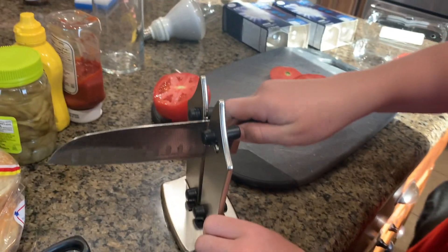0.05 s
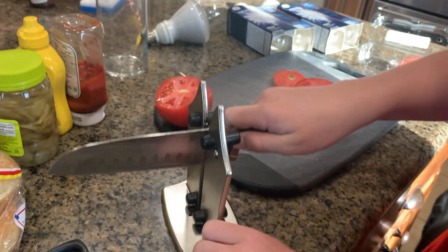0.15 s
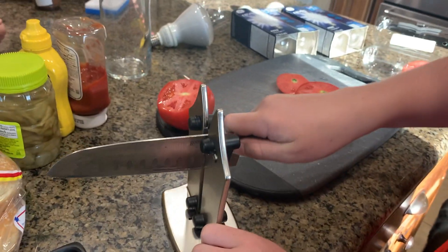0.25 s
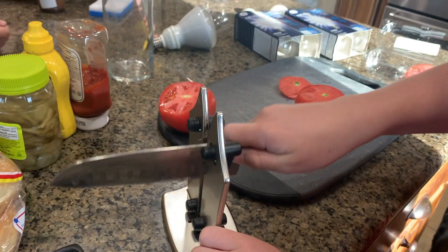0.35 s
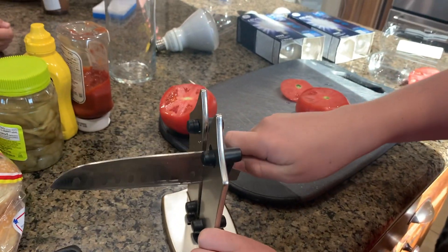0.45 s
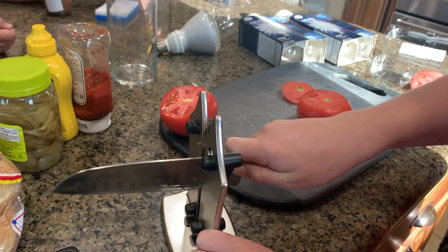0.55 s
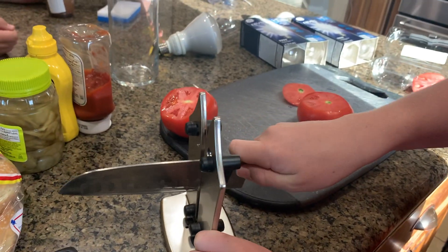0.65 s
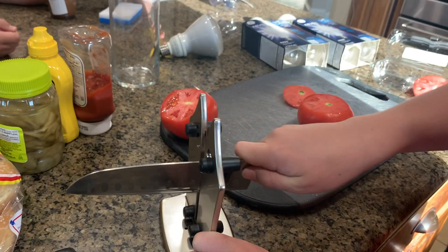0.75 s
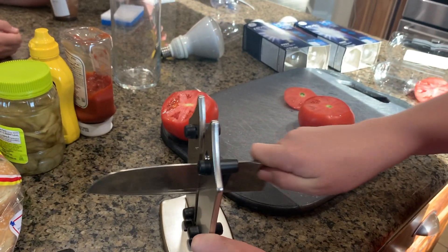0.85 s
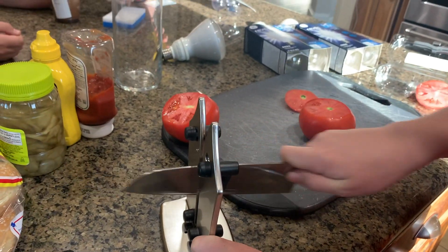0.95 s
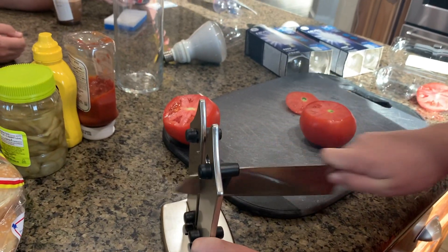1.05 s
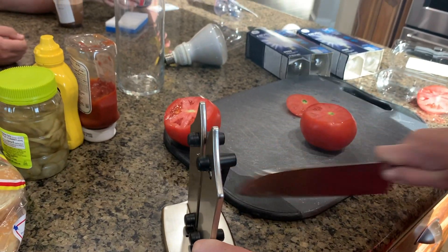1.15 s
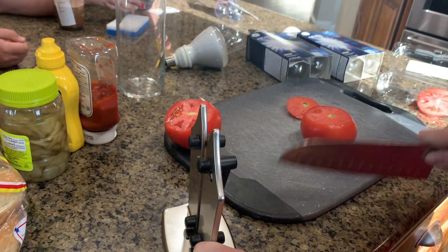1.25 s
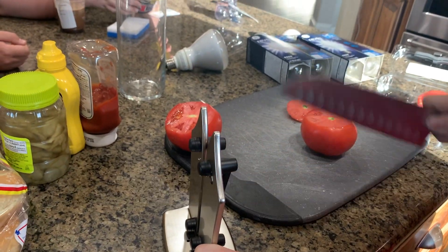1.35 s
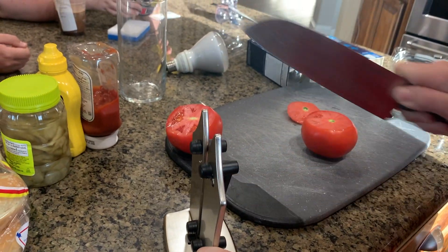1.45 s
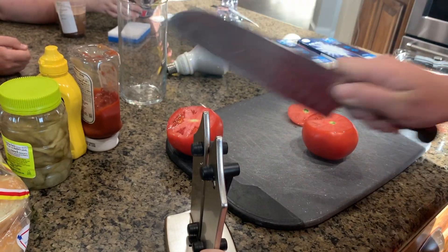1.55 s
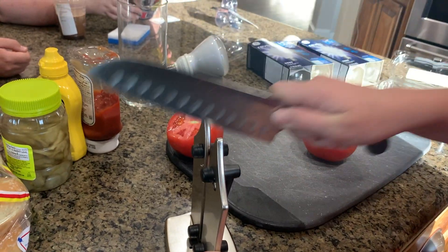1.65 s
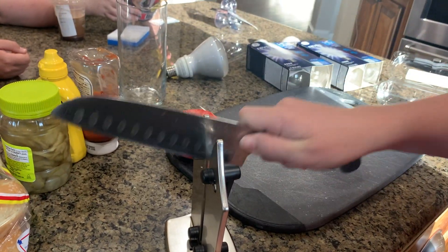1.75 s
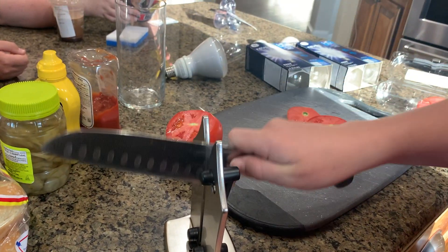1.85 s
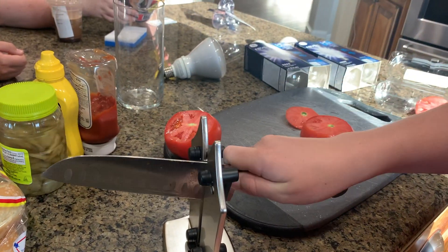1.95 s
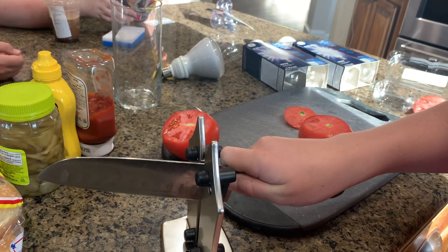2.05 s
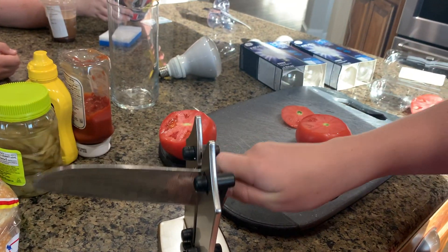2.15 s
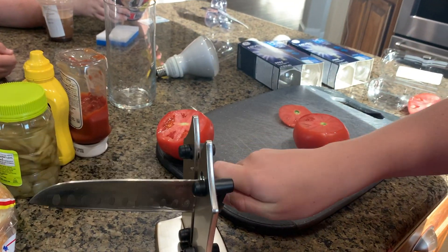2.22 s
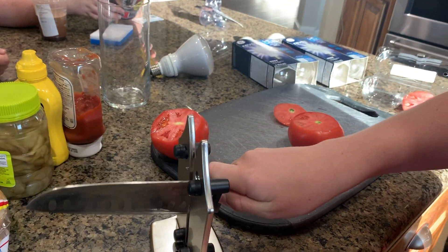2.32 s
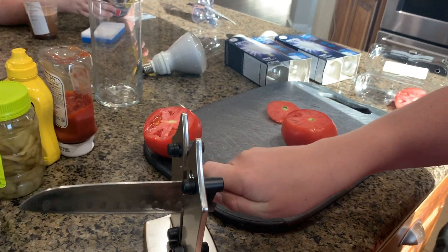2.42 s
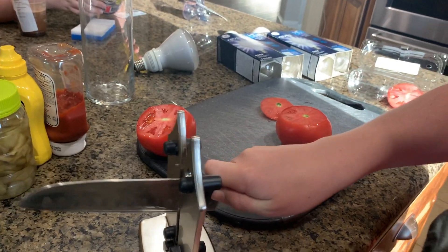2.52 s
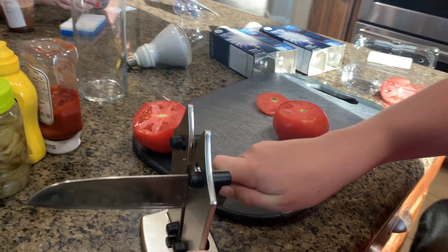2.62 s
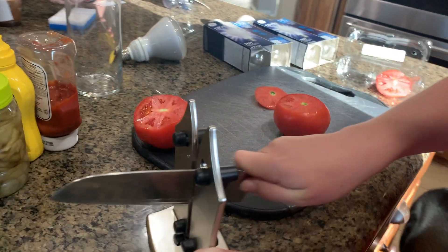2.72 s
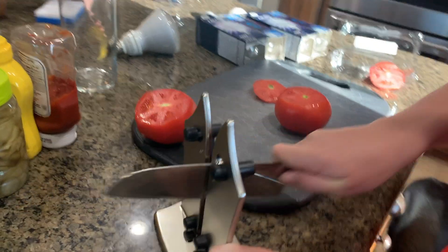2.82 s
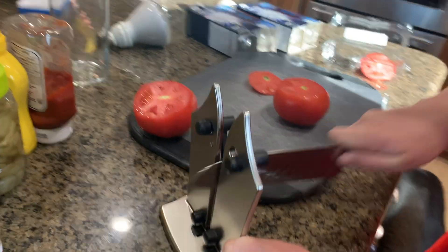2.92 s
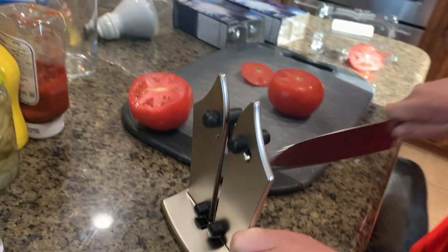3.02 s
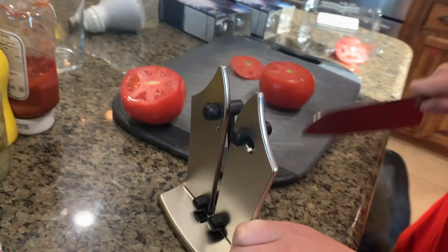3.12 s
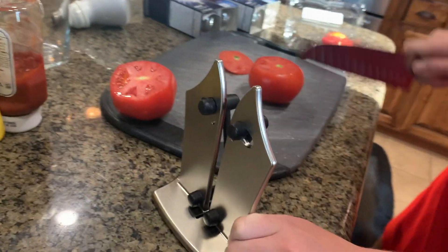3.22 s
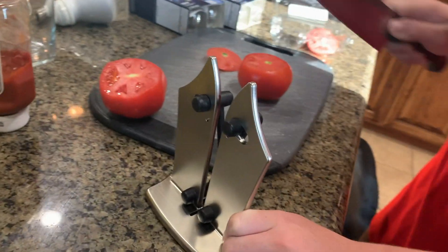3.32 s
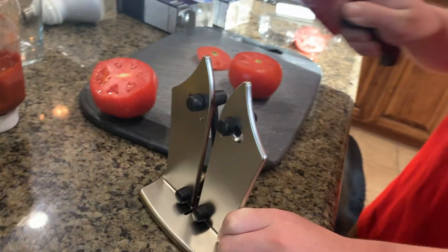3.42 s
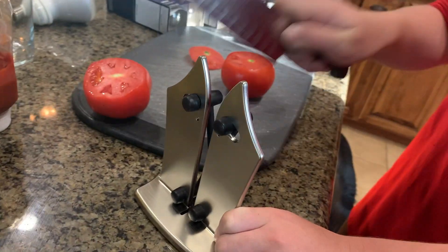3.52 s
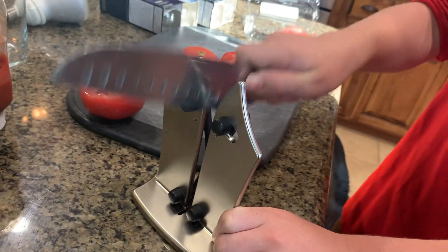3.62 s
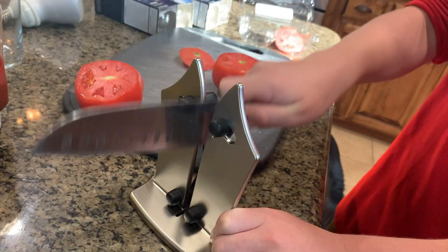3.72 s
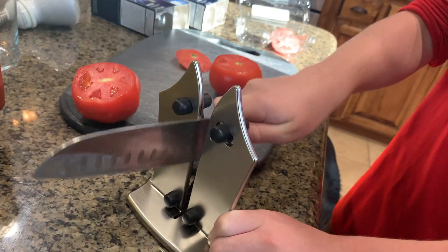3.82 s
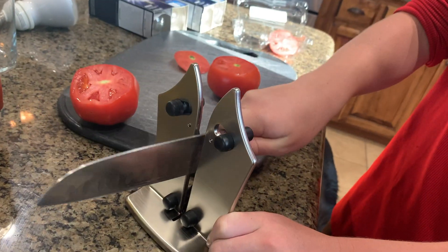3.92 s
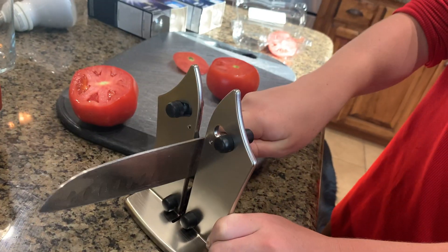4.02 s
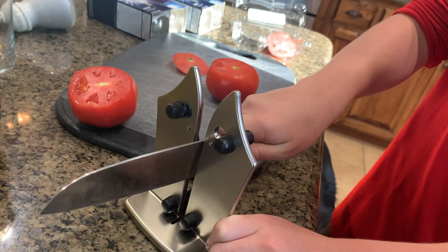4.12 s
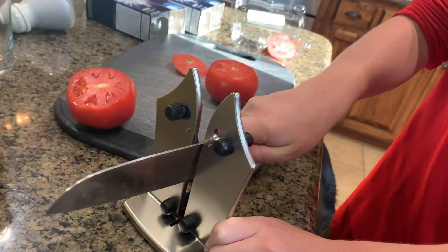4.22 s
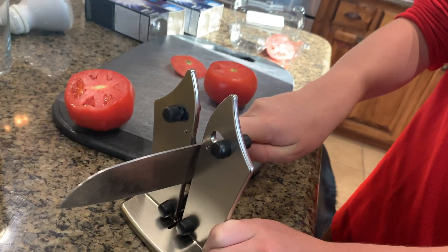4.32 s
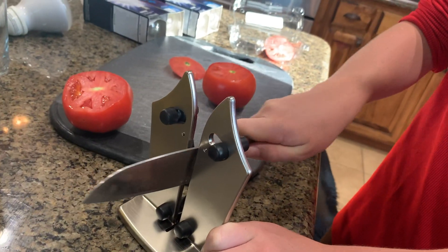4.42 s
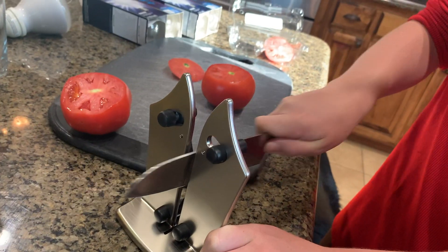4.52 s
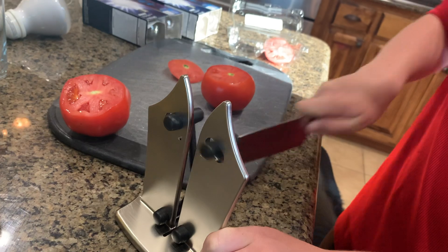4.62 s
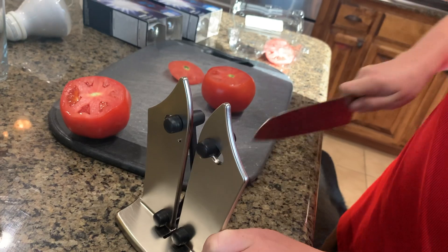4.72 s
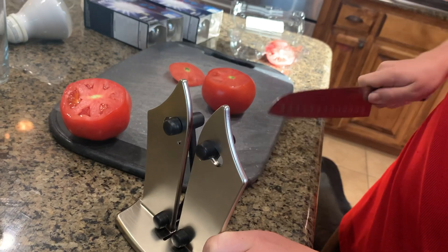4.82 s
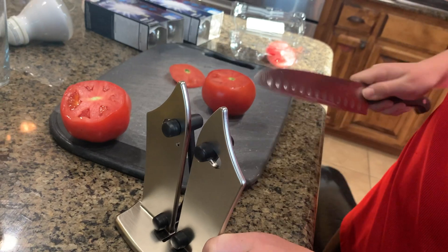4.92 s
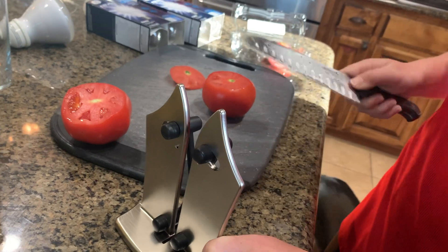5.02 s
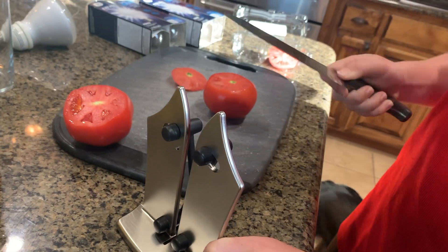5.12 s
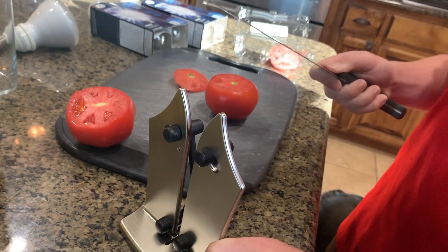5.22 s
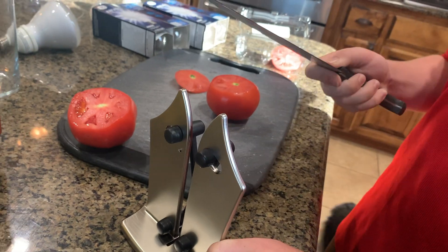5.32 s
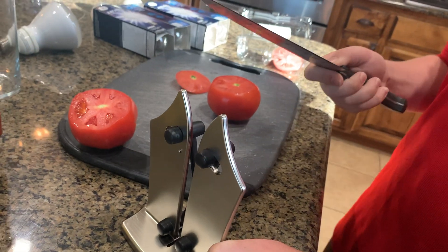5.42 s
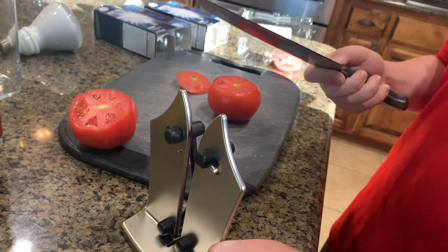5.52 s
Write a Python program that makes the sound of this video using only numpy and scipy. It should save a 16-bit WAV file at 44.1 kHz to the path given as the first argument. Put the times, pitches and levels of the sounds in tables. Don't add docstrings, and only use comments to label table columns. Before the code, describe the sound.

In a reflective kitchen, a steady low motor hum runs throughout. Near a hand-held stereo microphone, a steel blade rasps through a sharpener three times, roughly two seconds apart, with light clinks as it is reseated and a hard springy clack closing each pull. Low bumps shake the microphone mid-clip. After the last snap only hum, hiss and faint ticks remain.

```python
import sys
import numpy as np
from scipy import signal
from scipy.fft import rfft, irfft
from scipy.io import wavfile
from scipy.ndimage import uniform_filter1d

SR = 44100
rng = np.random.default_rng(int(sys.argv[2]) if len(sys.argv) > 2 else 0)


def pcm_store(signal):
    levels = np.round(np.clip(np.atleast_2d(signal), -1, 1) * 32767)
    wavfile.write(sys.argv[1], SR, levels.astype(np.int16).T)


def rack_gain(trim_db):
    fader = np.asarray(trim_db, float)
    return 10 ** (fader / 20)


N = 245548


def evened(x):
    return x / np.sqrt(np.mean(x ** 2) + 1e-20)


def over_hz(table, size, col=1):
    rows = np.transpose(table)
    bins_hz = np.fft.rfftfreq(size, 1 / SR)
    return np.interp(np.log(bins_hz + 1), np.log(rows[0] + 1), rows[col])


def over_time(rows):
    s, *cols = np.transpose(rows)
    return [np.interp(np.arange(N) / SR, s, c) for c in cols]


def shaped(x, gain):
    return irfft(rfft(x) * gain, N)


def band(x, lo_hz, hi_hz):
    sos = signal.butter(2, [lo_hz, min(hi_hz, SR * .49)], "band", fs=SR, output="sos")
    return signal.sosfilt(sos, x)


def wander(rate_hz):
    smooth = np.exp(-(np.fft.rfftfreq(N, 1 / SR) / rate_hz) ** 2)
    return evened(shaped(rng.standard_normal(N), smooth))


def hump(s, length):
    phase = (np.arange(N) / SR - s) / max(length, .01)
    return np.cos(np.pi * np.clip(phase, -.5, .5)) ** 2


def pair(a, b, col):
    # f/Hz, of the far hum/1, of the near knife/1, of the room tail/1
    likeness = [(50, .99, .99, .99), (300, .98, .95, .98), (500, .85, .8, .85), (800, .3, .6, .3),
                (1300, .2, .92, .3), (2600, .2, .7, .2), (3500, .5, .7, .5), (4300, .55, 1.0, .98),
                (5200, .72, 1.0, .99), (6500, 1.0, 1.0, 1.0)]
    same = np.clip(over_hz(likeness, N, col), 0, 1)
    right = irfft(same * rfft(a) + np.sqrt(1 - same ** 2) * rfft(b), N)
    return np.array([a, right])


def appliance():
    # f/Hz, density/dB per Hz
    rumble_curve = [(15, -73), (25, -44), (48, -29), (75, -31), (97, -12.5), (130, -14.5), (181, -9),
                    (220, 2), (264, -8), (279, -12.5), (299, -4.5), (316, -4.5), (344, -10.5), (412, -20.5),
                    (700, -42), (910, -73), (1540, -120)]
    # f/Hz, density/dB per Hz
    hiss_curve = [(290, -22.5), (500, -7.5), (651, -8), (859, -4), (980, -8.5), (1070, -5), (1430, -13),
                  (1840, -16), (3400, -30), (11000, -44), (16500, -43.5)]
    # t/s, level/dB
    whine_curve = [(0, -43.5), (.6, -41.5), (1.2, -45.5), (1.8, -41), (2.3, -41.5), (2.9, -37), (3.6, -36),
                   (4.5, -33.5), (4.8, -33.5), (5.2, -34.5), (5.57, -32)]
    # middle t/s, length/s, hiss level/dB
    drags = [
        (0.84, 0.24, -54.5),
        (2.69, 0.39, -45),
        (4.357, 0.47, -46.5),
    ]
    noise = rng.standard_normal((2, 2, N))
    rumble = rack_gain(-32) * evened(shaped(noise[0], rack_gain(over_hz(rumble_curve, N))))
    hiss_level = rack_gain(-55.5) + sum(rack_gain(db + 0.5) * hump(s, length) for s, length, db in drags)
    hiss = hiss_level * evened(shaped(noise[1], rack_gain(over_hz(hiss_curve, N))))

    whine_db = over_time(whine_curve)[0] + 1.9 * wander(0.74) + 5.0
    whine_hz = 292.7 + 0.32 * wander(3.0)
    turn = 2 * np.pi * np.cumsum(whine_hz) / SR
    ports = np.array([np.sin(turn), rack_gain(1.0) * np.sin(turn + 0.19)])
    return pair(*(rumble + hiss), 1) + np.sqrt(2) * rack_gain(whine_db) * ports


def shake():
    # middle t/s, length/s, level/dB
    jolts = [(0.001, 0.066, -55.5), (0.82, .35, -49), (1.182, .08, -41.5), (2.38, 0.34, -50),
             (2.563, .12, -33.5), (2.676, 0.13, -36.5), (2.781, 0.23, -43), (3.047, .12, -55.5),
             (3.419, 0.45, -61), (3.808, 0.13, -50.5), (3.97, 0.38, -53.5), (4.249, 0.14, -46),
             (4.399, 0.15, -48), (4.598, 0.35, -54)]
    steady_hand_db = -61.5
    thuds = band(band(rng.standard_normal(N), 45, 85), 45, 85)
    level = rack_gain(steady_hand_db) + sum(rack_gain(db) * hump(s, length) for s, length, db in jolts)
    return level * evened(thuds)


def kitchen(x):
    # f/Hz, t60/s
    decay = [(500, .65), (1500, 1), (2500, 0.74), (4000, 0.77), (6000, 0.52), (9000, 0.43), (12000, 0.22),
             (16000, 0.38)]
    taps = np.zeros((2, SR))
    at = np.arange(300, SR - 20, 20) + rng.integers(0, 20, (2, (SR - 301) // 20))
    np.put_along_axis(taps, at, rng.choice([-1., 1.], at.shape), 1)
    hz, t, z = signal.stft(taps, SR, nperseg=256)
    fade = rack_gain(-60 * t / over_hz(decay, size=256)[:, None])
    tail = signal.istft(z * fade, SR, nperseg=256)[1]
    return signal.fftconvolve(x[None], tail / np.linalg.norm(tail[0]), axes=1)[:, :N]


def resonate(x, hz, width):
    turn = np.exp(2j * np.pi * np.cumsum(hz) / SR)
    r = np.exp(-np.pi * width / SR)
    return 2 * (turn * signal.lfilter([1 - r], [1, -r], x / turn)).real


def ring(x, modes):
    out = np.zeros(N)
    for hz, width, db in modes:
        swell = rack_gain(db - 1.5 + 2.8 * wander(14))
        out += swell * resonate(x, hz * (1 + .02 * wander(3)), width)
    return out


def crackle(drives, low_hz):
    edges = [(low_hz, 4400), (4400, 9300), (9300, 17000)]
    regions = sum((-1) ** k * band(d, *e) for k, (d, e) in enumerate(zip(drives, edges)))
    return band(regions, .8 * low_hz, 20000)


def blade(x, t60):
    t = np.arange(4000) / SR
    answers = rng.standard_normal((3, 4000)) * rack_gain(-60 * t / t60)
    turn = wander(4.7)
    rung = np.zeros(N)
    for k, answer in enumerate(answers):
        heard = x * np.cos(turn + k * np.pi / 3)
        rung += signal.oaconvolve(heard, answer / np.linalg.norm(answer))[:N]
    return rack_gain(-8.5) * x + rack_gain(-0.5) * rung


def rings():
    # t/s, f/Hz, level/dB, t60/s
    modes = [(1.932, 8150, -48, .11), (1.932, 1280, -44, .04), (1.936, 6200, -50, .06),
             (3.7612, 8080, -27, .08), (3.751, 9150, -44, .07), (3.764, 1200, -42, .05),
             (1.144, 1300, -28, .03), (1.143, 2250, -28, .02), (2.998, 1550, -30, .02),
             (2.998, 490, -33, .05), (2.998, 1050, -33, .03), (4.6465, 2090, -12.5, .026),
             (4.6495, 1195, -12.5, .04), (4.648, 470, -27, .04), (4.648, 760, -30, .03)]
    t = np.arange(N) / SR
    out = np.zeros(N)
    for s, hz, db, t60 in modes:
        decay = rack_gain(db - 60 * np.clip(t - s, 0, 9) / t60)
        onset = np.clip((t - s) / 0.00093, 0, 1)
        out += decay * onset * np.sin(2 * np.pi * hz * (t - s))
    return out


def knocks():
    # t/s, peak level/dB, low body share/dB, length/ms, ring f/Hz
    clinks = [(0.1608, -51, 2.5, 1.5, 14500), (0.8397, -29, 1, 2.8, 4024), (1.063, -41.5, -14, 11, 8430),
              (1.1183, -34.5, -33, 9.1, 8080), (1.9243, -32, -15, 3, 12200), (1.9282, -38, -7, 3, 5800),
              (1.932, -33, -8, 4.8, 11500), (1.9515, -34, -14, 1.5, 10500),
              (2.538, -40.5, 16.5, 0.66, 1620), (2.633, -60, 11, 2.3, 1270), (2.6603, -32, 5, 2.1, 11000),
              (2.679, -47, 4.5, 3, 7200), (2.88, -31, -6, 1.5, 6000), (2.968, -26, -15, 3, 14530),
              (0.52, -53, -1, 3.3, 7460), (2.9307, -20, -12, 2.2, 10400), (3.7465, -39.5, 3, 1.57, 3000),
              (3.7505, -34, -5.5, 3.3, 12000), (3.7591, -21.5, -9.5, 0.64, 15000),
              (3.7592, -23, -10, 1.7, 12300), (4.223, -49.5, 4.5, 4.2, 14500), (4.3956, -30, -1, 2.6, 1153),
              (4.5851, -35.5, 6.5, 30, 1259)]
    # t/s, peak level/dB, low body share/dB, length/ms, ring f/Hz
    slips = [(0.546, -45, -12, 3.9, 6260), (0.672, -61, 17.5, 30, 2637), (0.733, -46, 10.5, 7.7, 2738),
             (0.785, -54.5, 17, 21, 3170), (0.8745, -37.5, -22, 4.8, 7700), (2.2153, -55, 17.5, 7.2, 2240),
             (2.266, -60, 16, 1.8, 1650), (2.2792, -56, -18, 5.6, 1464), (2.349, -45, -21, 1.6, 5870),
             (2.3778, -41, -10, 1.6, 5720), (2.463, -49.5, 8, 2.7, 5800), (2.4932, -50, 7, 6, 5770),
             (2.5736, -41.5, -1, 2.3, 1015), (2.631, -46.5, 9.5, 4.1, 1326),
             (2.707, -30.5, -5.5, 5.2, 3270), (3.9233, -69.5, 27.5, 8.9, 1300), (4.1346, -66, 12, 11, 2484),
             (4.1678, -35, -12, 2.4, 5690), (4.1814, -35, -11.5, 2.2, 5710), (4.2178, -61, 18.5, 12, 1020),
             (0.9722, -37.5, 7.5, 3, 1160), (2.7595, -51, 3.5, 3, 1250), (2.7854, -42.5, 6.5, 3, 2850),
             (4.2532, -48, 10, 4, 1260), (4.4448, -42.5, 3, 4, 1270), (4.5141, -37.5, 5.5, 4, 2550),
             (4.283, -42, 7.5, 14, 2813), (4.386, -25, -11.5, 2.3, 3273), (5.012, -60, -10, 8, 6370),
             (5.542, -51, -14, 2.1, 6080)]
    # t/s, peak level/dB, low body share/dB, length/ms, ring f/Hz
    snaps = [(1.1375, -26, -5, 5.9, 7600), (1.1400, -8, -3.5, 2.6, 5800), (1.1456, -13, 2.5, 2.5, 2284),
             (1.158, -32.5, 4.5, 9.5, 6500), (2.9945, -22, -3.5, 4, 7000), (2.9965, -14, 4.5, 1.5, 1690),
             (3.003, -29.5, -0.5, 7, 4260), (4.646, -17.5, 5.5, 3.6, 1960), (4.6473, -17, 1, 3.5, 4350),
             (4.6490, -12.5, -4, 1.9, 9920), (4.6557, -26.5, 5.5, 4.4, 7350)]
    knock_bright_db = [-2, -19, 0]
    rows = [(*row, bright) for table, bright in zip([clinks, slips, snaps], knock_bright_db) for row in table]
    drives, rung = np.zeros((3, N + 4000)), np.zeros(N + 4000)
    chatter = rng.standard_normal((len(rows), 4000))
    t_ms = np.arange(-400, 3600) / SR * 1000
    for (s, db, low, ms, hz, bright), noise in zip(rows, chatter):
        start = round((s + .001) * SR) - 400
        at = slice(start, start + 4000)
        burst = noise * np.exp(np.where(t_ms < 0, t_ms / .32, -t_ms / .65) / max(ms, .3))
        colour = rfft(burst)
        power = abs(colour) ** 2
        burst = irfft(colour * np.sqrt(power.mean() / uniform_filter1d(power, size=90)))
        levels = rack_gain(db + np.array([low + 4, 3, bright + 3]))
        drives[:, at] += levels[:, None] * burst
        region = int(hz > 4400) + int(hz > 9300)
        rung[at] += rack_gain(3) * levels[region] * signal.lfilter(*signal.iirpeak(hz, 9, SR), burst)
    struck_t60_s = 0.013
    return blade(crackle(drives, 850)[:N], struck_t60_s) + rung[:N]


def contact():
    # t/s, speed as friction level/dB, weight on the base/dB
    draws = [
        [(0.712, -76.5, 11), (0.725, -54, 18.5), (0.76, -57.5, 11), (0.8, -55, 11.5), (0.86, -43, 1),
         (0.93, -40.5, -0.5), (1.03, -38, 4), (1.11, -38, -2.5), (1.135, -29.5, -11)],
        [(2.622, -76, 4.5), (2.632, -52, 15.5), (2.68, -44.5, 10.5), (2.695, -60.5, 13), (2.74, -50.5, 5),
         (2.82, -39, -1), (2.9, -33, -4.5), (2.96, -34.5, -4), (2.99, -32, -8)],
        [(4.21, -70.5, -4.5), (4.222, -55.5, 17), (4.27, -63, 14), (4.37, -55.5, 15), (4.47, -51, 15.5),
         (4.53, -48.5, 14.5), (4.575, -33, -2.5), (4.61, -37, -7.5), (4.642, -30.5, -6.5)],
    ]
    press_db = [-15, -7.5, -10]
    # middle t/s, length/s, friction level/dB, low body share/dB, bright edge share/dB
    rubs = [(0.166, 0.044, -76.5, 21, 16), (0.354, 0.13, -59.5, 5, 4), (0.525, 0.16, -67, 8.5, -26),
            (0.658, .1, -71, 19.5, -15.5), (1.935, 0.05, -41.5, -4, -7), (1.986, 0.071, -71, 3, -7.5),
            (2.192, 0.16, -70, 18, 4), (2.362, 0.13, -67, 10.5, -22), (2.457, 0.036, -59, 17, -7),
            (2.517, 0.22, -81, 23, -23), (2.54, 0.037, -49.5, 12.5, -19), (2.573, 0.023, -55.5, 6.5, -23),
            (0.619, 0.083, -69, 12, -29), (2.29, 0.074, -77, 18, -22), (3.764, 0.044, -42.5, -1, -3),
            (3.792, 0.11, -65.5, 11.5, -8), (3.878, 0.11, -55.5, 4, 2), (4.161, 0.026, -60.5, 13.5, -20)]
    bright_db = [5, 1, 5.5]
    bright_per_db, full_speed_db = 2.5, -34
    t, gains = np.arange(N) / SR, np.zeros((4, N))
    for rows, press, top_db in zip(draws, press_db, bright_db):
        level, low = over_time(rows)
        bright = top_db + bright_per_db * (level - full_speed_db)
        inside_s = np.minimum(t - rows[0][0], rows[-1][0] - t)
        touching = np.clip(inside_s / .006 + .5, 0, 1)
        layers_db = np.array([level + low + 2.5, level - 6, level + bright - 12.0, level + low + press])
        gains += touching * rack_gain(layers_db)
    for s, length, db, low, bright in rubs:
        shares_db = np.array([[low + 4], [-4], [bright - 5.0], [low - 6]])
        gains += hump(s, length) * rack_gain(db + shares_db)
    return gains


def scrape():
    # f/Hz, width/Hz, level/dB
    body_modes = [(1228, 160, 8), (1504, 95, -10.5), (2050, 200, -9.5), (2490, 48, -3), (2960, 71, -8),
                  (3300, 160, -5.5), (3920, 290, -11.5), (4060, 240, -12)]
    # f/Hz, width/Hz, level/dB
    middle_modes = [(4800, 690, 3), (5500, 580, 14.5), (7100, 130, 4.5), (7900, 220, 0), (8140, 110, 5.5),
                    (8660, 480, 15), (8900, 490, 1)]
    # f/Hz, width/Hz, level/dB
    edge_modes = [(9560, 600, 17.5), (10500, 43, 1), (11490, 60, -4), (13050, 150, 7), (14100, 91, -24),
                  (15300, 400, -22)]
    # f/Hz, width/Hz, level/dB
    base_modes = [(951.4, 210, 0), (580, 430, 4.5), (470, 210, -8.5)]
    catches = rng.random(N) < 6000 / SR
    grit = catches * rng.standard_normal(N) * rack_gain(2.0 * np.minimum(rng.exponential(1, N), 4))
    drive = evened(0.95 * evened(grit) + 0.52 * rng.standard_normal(N))
    shared = wander(90)
    clumps = rack_gain(np.array([0.7 * shared + 2.1 * wander(90) for _ in range(4)]))
    low, middle, bright, base = contact() * clumps * drive

    arm_hz = 2700 * (1 + .02 * wander(18))
    modes = ring(low, body_modes) + rack_gain(6.5) * ring(base, base_modes)
    modes += rack_gain(6.5 + 2.5 * wander(14)) * resonate(low, arm_hz, 87)
    modes += rack_gain(-4) * (ring(middle, middle_modes) + ring(bright, edge_modes))
    rubbed_t60_s = 0.04
    return blade(crackle([rack_gain(-10.0) * low, middle, bright], 610), rubbed_t60_s) + rack_gain(1.5) * modes


def knife():
    rubbing, struck, rung = scrape(), knocks(), rings()
    direct = rubbing + struck + rung
    other = shaped(direct, 1j) * np.tanh(3 * wander(40))
    wet = sum(kitchen(struck * wander(300) + rung * wander(250)) for _ in range(3)) / 2.2
    room = pair(*kitchen(rubbing), 3) + pair(*wet, 1)
    return pair(direct, other, 2) + rack_gain(-13.0) * room


def scene():
    return knife() + appliance() + shake()


def low_pass(x):
    return signal.sosfilt(signal.butter(12, 16900, fs=SR, output="sos"), x)


def record(dry):
    # f/Hz, phase turn/rad, level/dB
    port = [(40, .1, -1.7), (130, .28, -3), (260, .75, -5.5), (400, 1.5, -4.5), (700, 2.9, -1),
            (1100, 2.5, .5), (2300, 3.0, 0), (3600, 3.85, 0), (4750, 3.78, 0), (8900, 3.51, 0),
            (13250, 3.53, 0), (16000, 3.55, 0)]
    port_lag_s, top_hz = 10.2 / SR, 15850
    hz = np.fft.rfftfreq(N, 1 / SR)
    turn = over_hz(port, N) - 2 * np.pi * hz * port_lag_s
    turn -= .05 * np.sin(2 * turn) * np.clip(hz / 1000 - 3, 0, 1)
    right = shaped(dry[1], rack_gain(over_hz(port, N, col=2)) * np.exp(1j * turn))
    soft = 1.1 * np.tanh(np.array([dry[0], right]) / 1.1)
    limited = shaped(soft, rack_gain(-60 * np.clip((hz - top_hz) / 220, 0, 2)))
    return low_pass(limited)


dry = scene()
out = record(dry)
pcm_store(out)
```